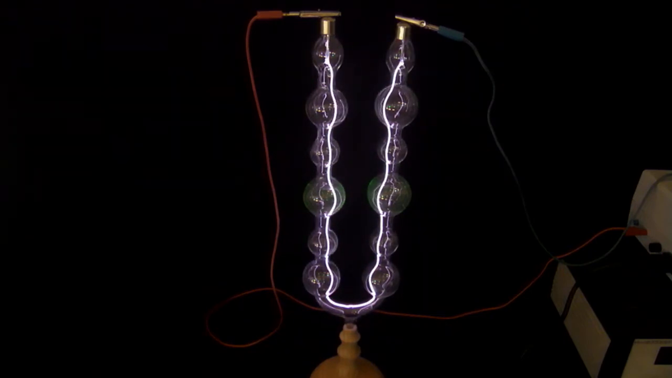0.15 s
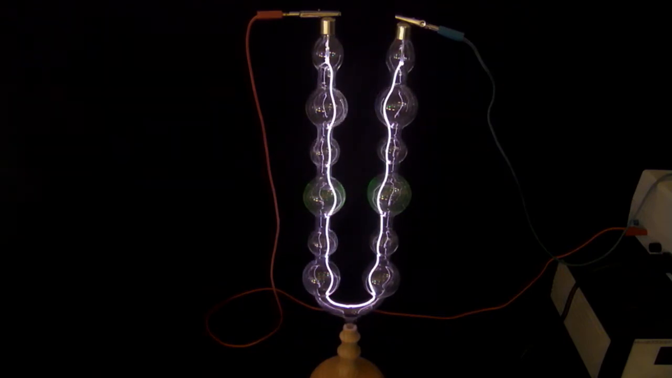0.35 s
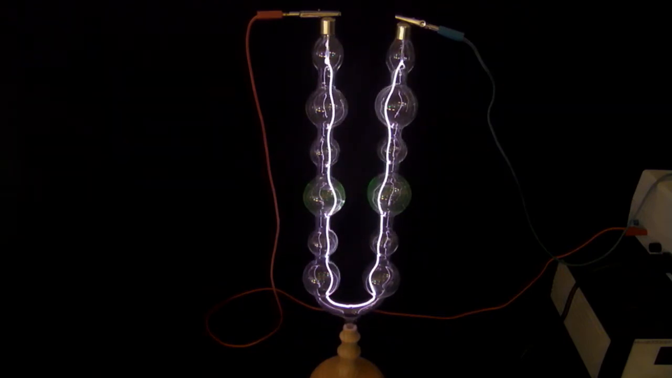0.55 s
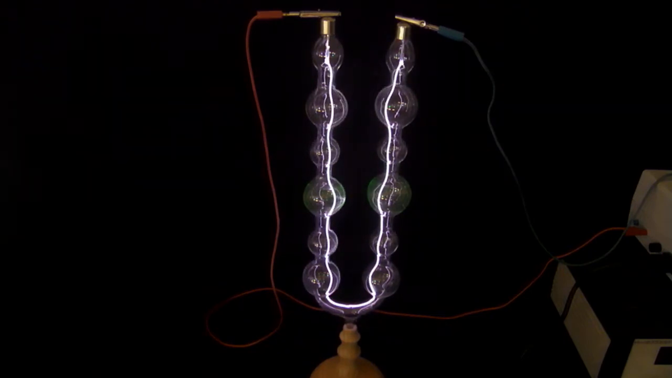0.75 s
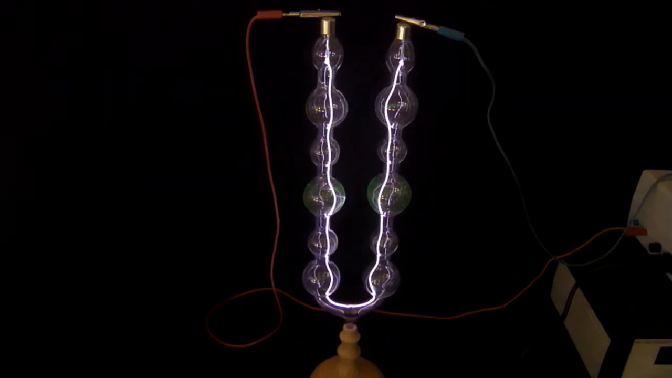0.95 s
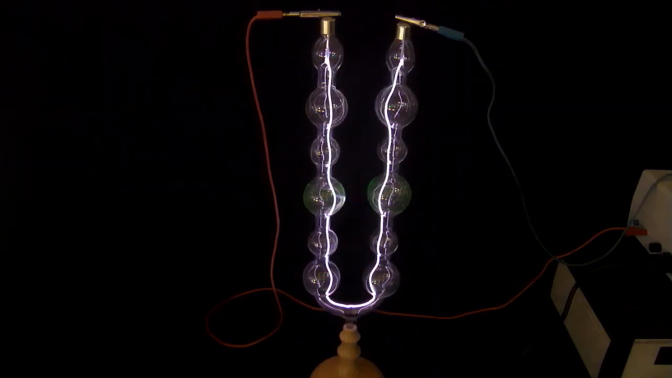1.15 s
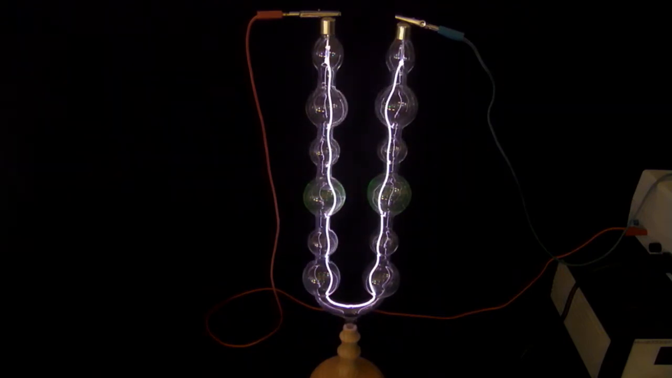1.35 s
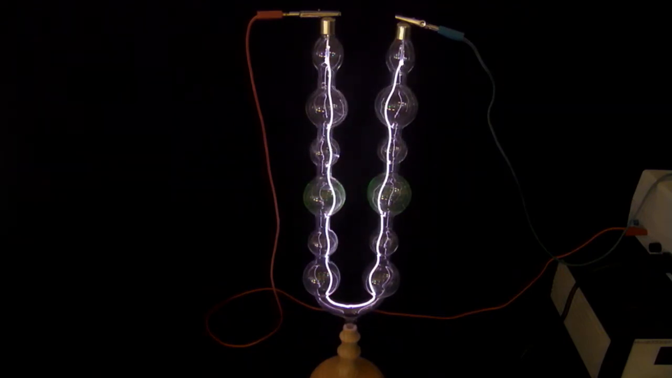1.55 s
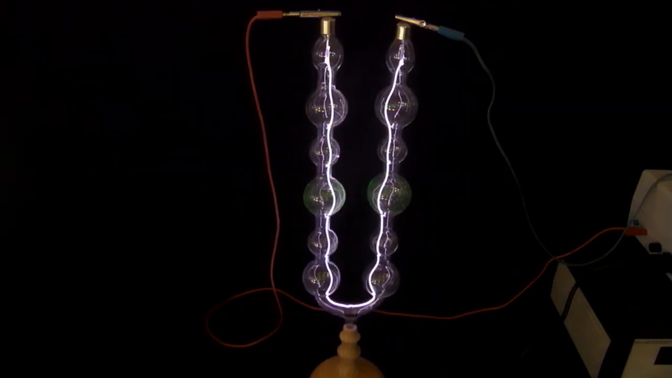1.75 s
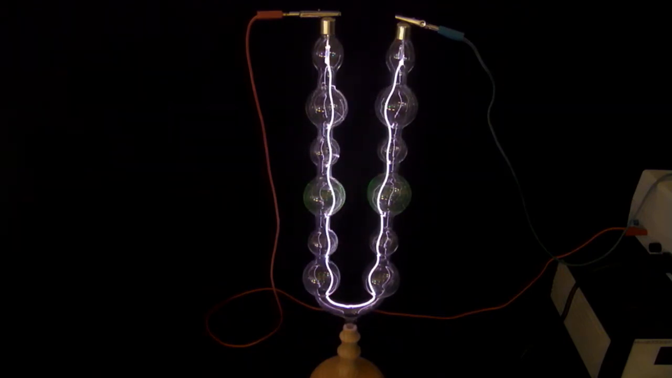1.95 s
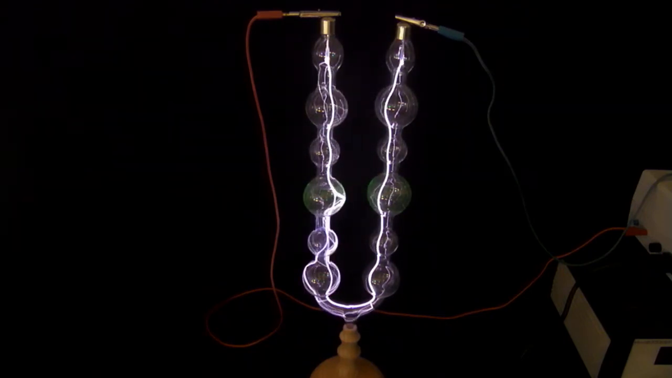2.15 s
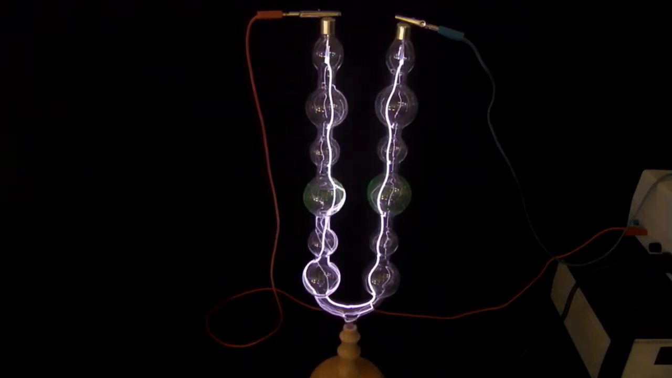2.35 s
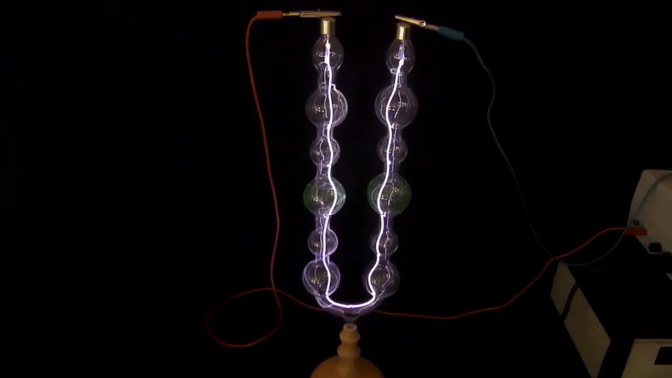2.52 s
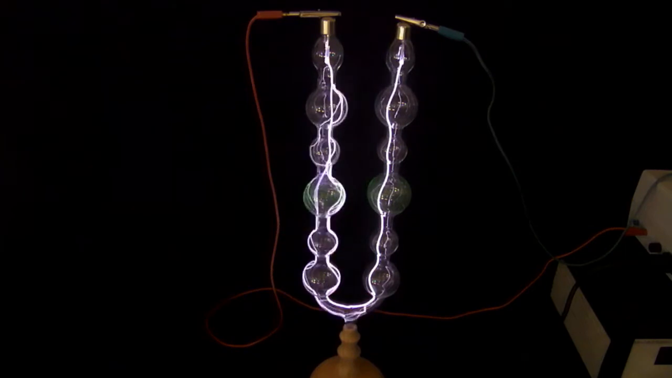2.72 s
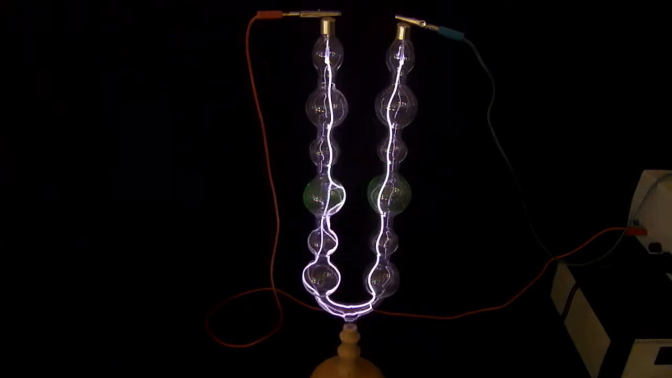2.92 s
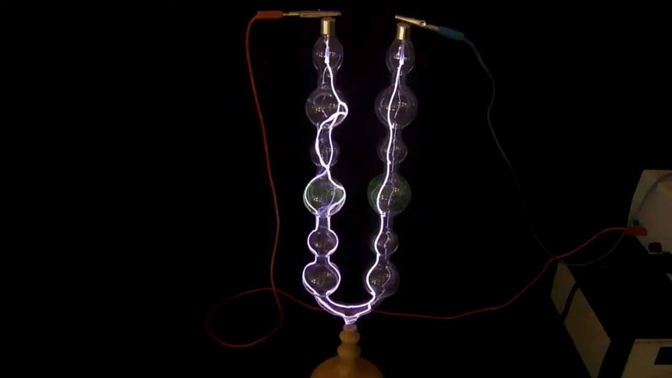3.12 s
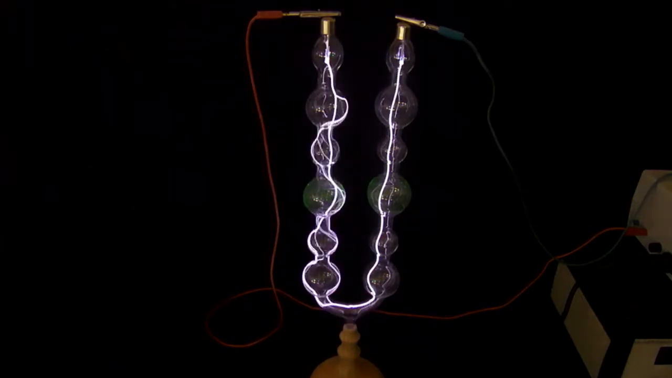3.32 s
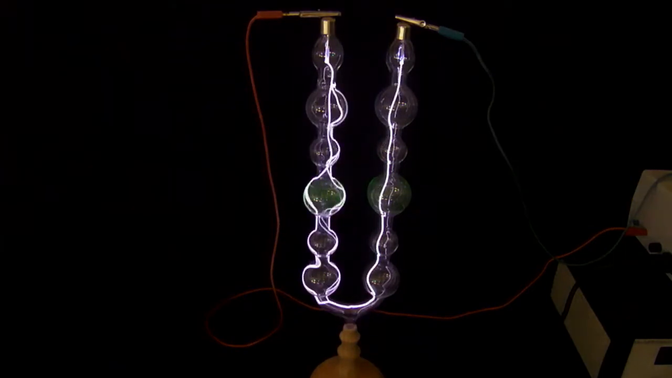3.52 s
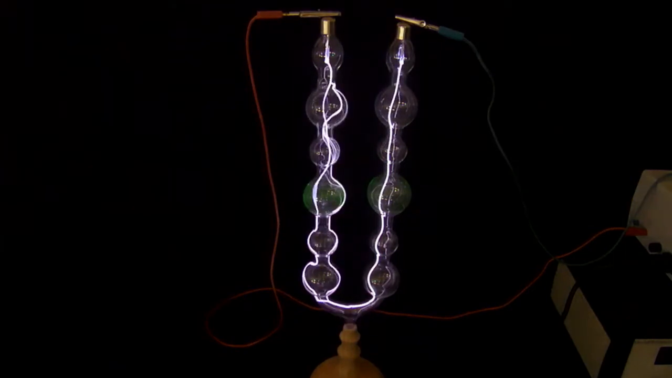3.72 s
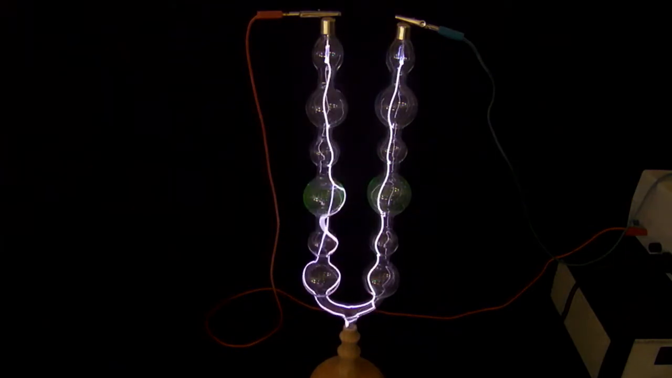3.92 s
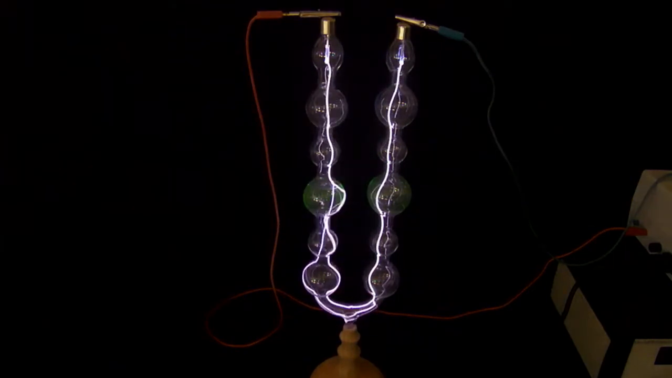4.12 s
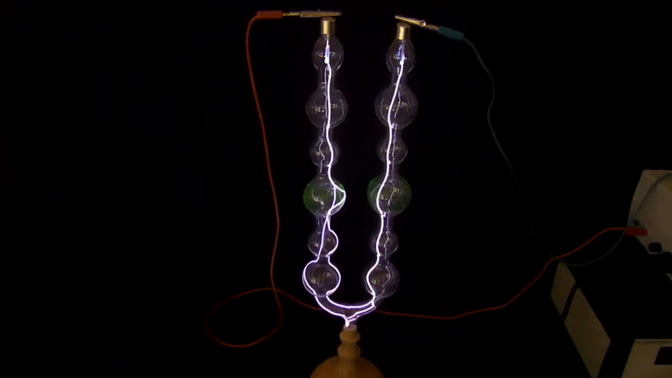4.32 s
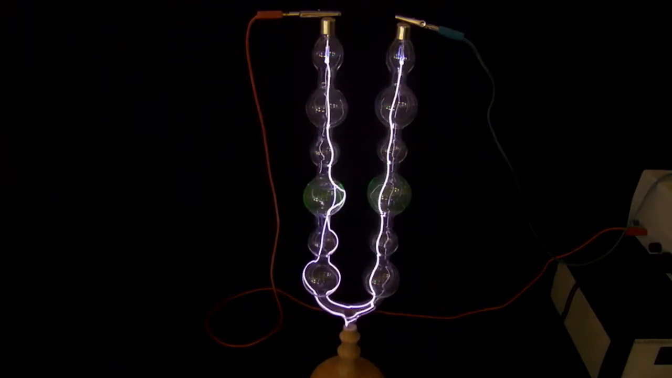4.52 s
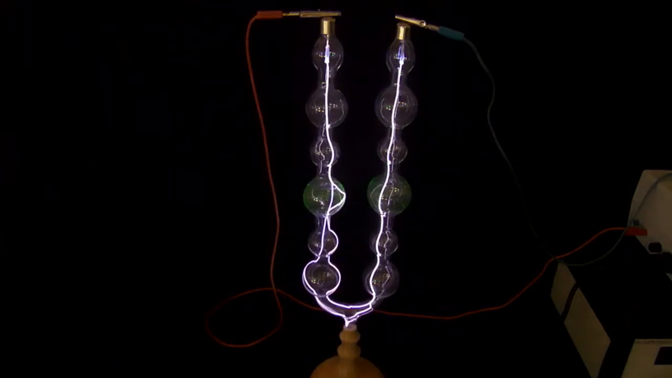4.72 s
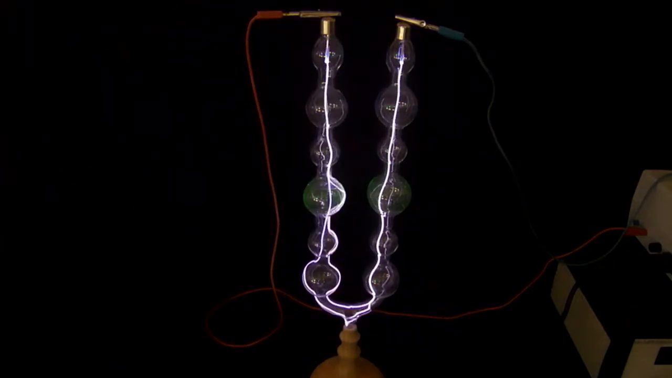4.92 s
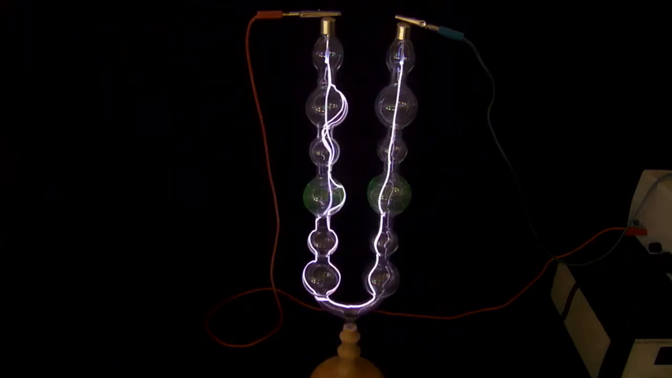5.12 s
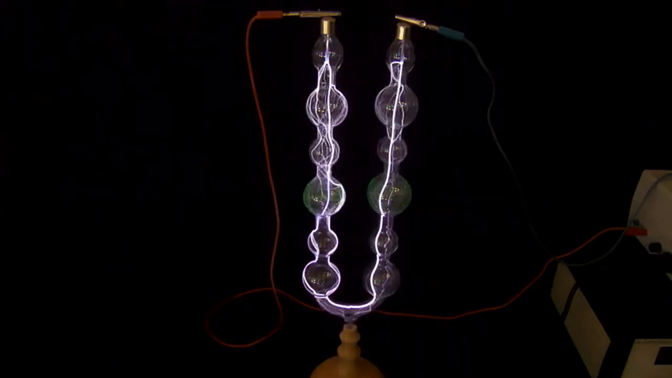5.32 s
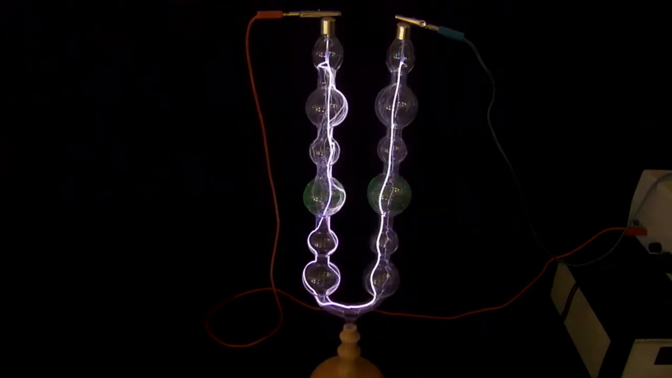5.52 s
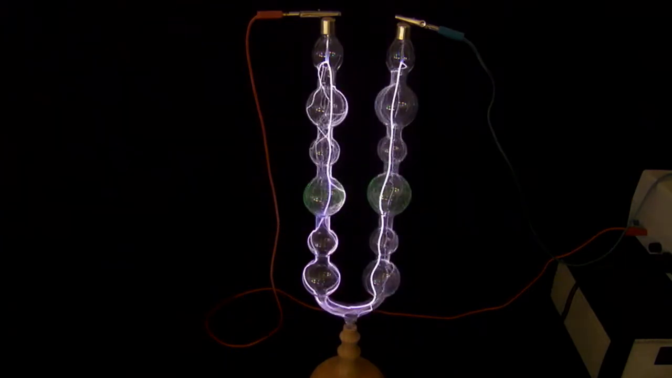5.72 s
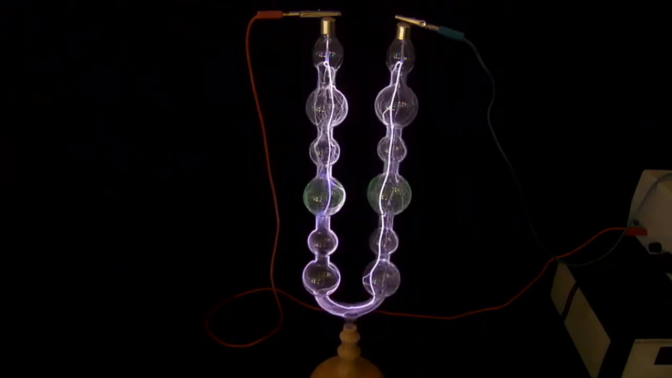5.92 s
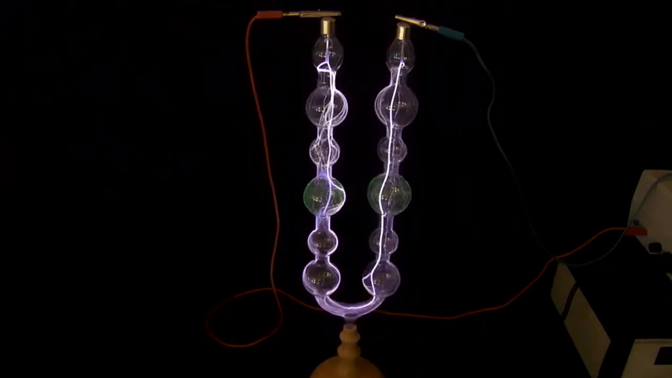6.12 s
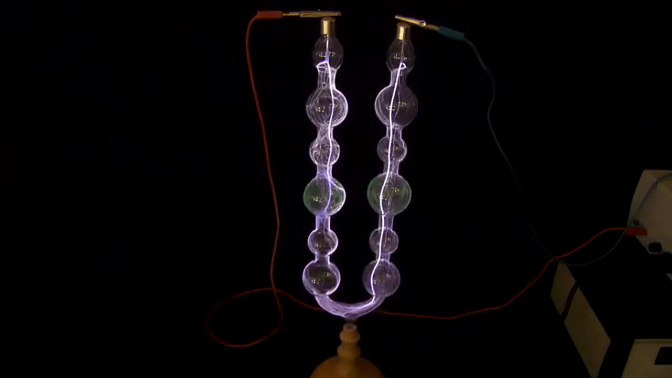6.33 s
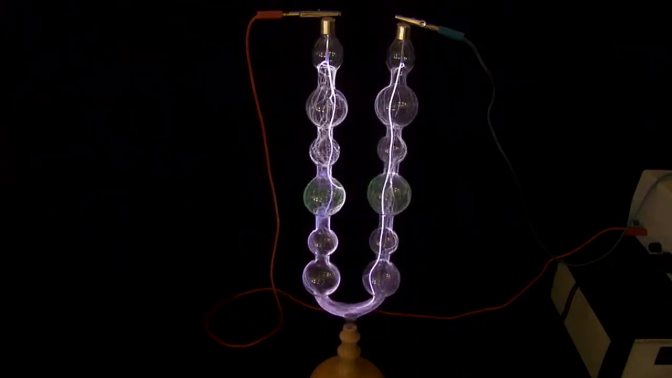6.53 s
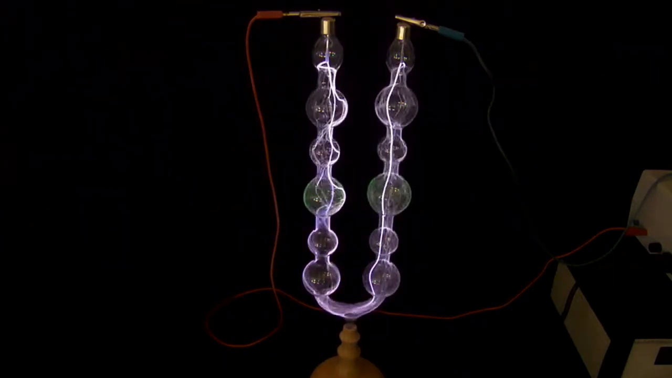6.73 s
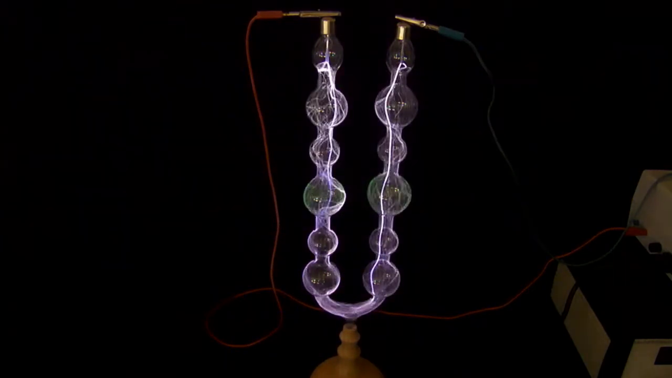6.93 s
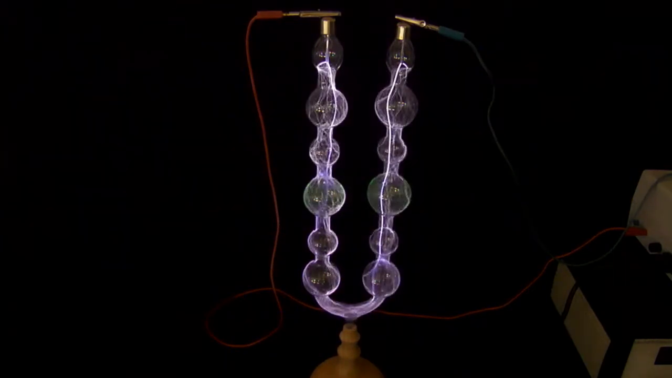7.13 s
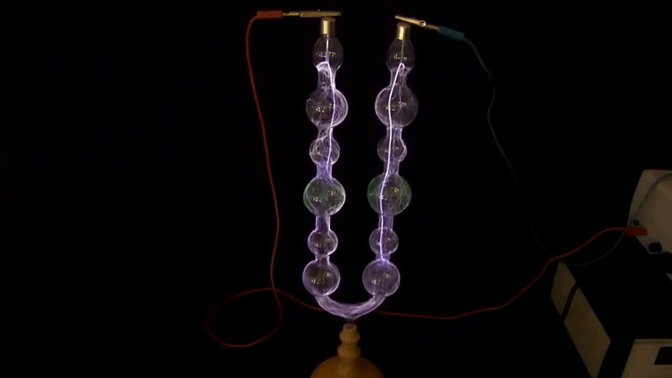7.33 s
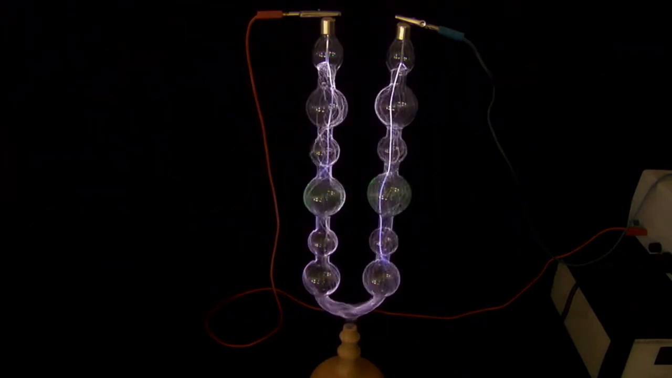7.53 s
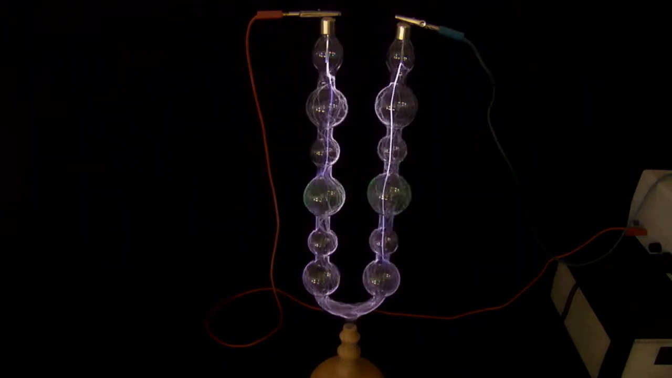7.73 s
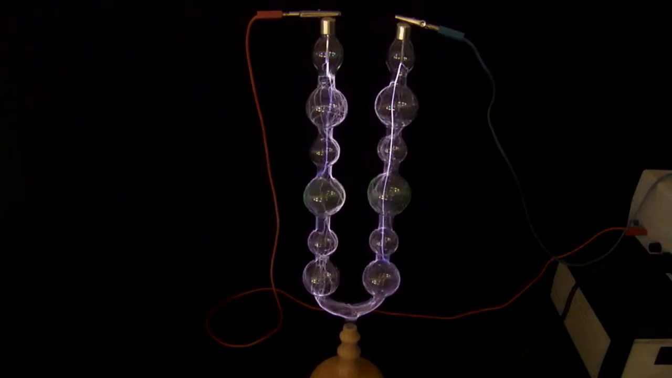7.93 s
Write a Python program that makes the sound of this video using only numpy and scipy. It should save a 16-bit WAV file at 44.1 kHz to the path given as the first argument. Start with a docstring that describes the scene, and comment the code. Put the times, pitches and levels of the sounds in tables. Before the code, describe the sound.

Continuous, ringing electrical sputter with a sharp metallic treble comes first, briefly surging around two seconds. A piercing, overtone-rich tone then sets in and is turned down by hand in three sweeps with two short holds. Fizzing drops away and flickers back midway, then thickens again over the falling buzz. Single microphone in a quiet indoor room, little reverberation, no other activity.

```python
"""A gas discharge tube on a high-voltage supply hisses in a quiet room: uneven breakdowns in the gas kick the
transformer core, which rings in fixed modes. At 2.7 s the supply's pulse rate locks into a whine, a stack of
overtones turned down by hand in three sweeps with two rests. Mostly between 3 and 5.5 s the sputter drops out
and returns in bursts. Room echo, room tone, microphone hiss and faint tones lie beneath, and a gain control
holds back loud moments of the one microphone."""
import sys
import numpy as np
from scipy import signal
from scipy.fft import rfft, irfft, next_fast_len
from scipy.io import wavfile
from scipy.ndimage import uniform_filter1d, map_coordinates

SR = 44100
rng = np.random.default_rng(int(sys.argv[2]) if len(sys.argv) > 2 else 0)


def persist_wave(psi):
    """Save psi, clipped to +-1, as 16-bit WAV."""
    counts = np.round(np.clip(psi, -1, 1) * 32767).astype(np.int16)
    wavfile.write(sys.argv[1], SR, np.atleast_2d(counts).T)


def boost_factor(decibels):
    """Convert a level in decibels to a linear amplitude factor."""
    exponent = np.asarray(decibels, float) / 20
    return 10 ** exponent


N = 355446

# strength of the uneven breakdowns and signed share of each kick that swings back: t/s, level/dB, share
SPUTTER = [(0, -1.5, -0.13), (.7, .5, -0.0027), (2.15, -0.5, -0.042), (2.23, 3, -0.23), (2.5, 0.5, -0.18),
           (2.62, -1.5, -0.0083), (2.8, -0.5, 0.23), (3.5, .5, 0.48), (4.35, -2, 0.35), (4.9, -5.5, -0.33),
           (5.2, -8, -0.019), (5.5, -3, -0.1), (6, 0, -0.23), (6.6, 1.5, -0.3), (7.3, 1, -0.42),
           (7.7, -2.5, -0.52), (8.06, -3, -0.42)]
# the arc burns evenly and the sputter drops out: t/s, length/s, level change/dB
LULLS = [(2.195, .025, -5), (3.09, .015, -7), (3.112, .058, -8), (3.205, .045, -11), (3.385, .012, -7),
         (3.42, .012, -7), (3.565, .13, -15), (3.695, .048, -25), (3.752, .01, -10), (3.775, .012, -8),
         (3.8, .04, -13), (3.865, .012, -8), (3.89, .012, -8), (3.92, .022, -14), (3.952, .019, -12),
         (3.99, .062, -15), (4.07, .071, -18), (4.153, .011, -14), (4.172, .009, -14), (4.192, .014, -15),
         (4.214, .017, -15), (4.24, .102, -18), (4.35, .703, -14), (5.083, .012, -7), (5.2, .03, -5),
         (5.275, .057, -8), (5.51, .015, -7)]
# pulse rate of the supply, turned down by hand in three sweeps with two rests: t/s, f/Hz
PULSE_RATE = [(2.735, 2760), (3.1, 2640), (3.3, 2578), (3.625, 2496), (3.95, 2408), (4.15, 2337),
              (4.35, 2297), (4.53, 2228), (4.625, 2217), (4.895, 2214), (4.925, 2169), (5.025, 1973),
              (5.075, 1885), (5.15, 1792), (5.2, 1755), (5.4, 1669), (5.725, 1579), (6.1, 1452),
              (6.35, 1345), (6.555, 1237), (6.88, 1234), (6.96, 1135), (7.0, 1102), (7.075, 1070),
              (7.35, 841), (7.475, 728), (7.535, 660), (7.66, 558), (7.725, 520), (7.79, 464), (7.875, 435),
              (7.93, 407), (8.06, 394)]
# the locked pulses: t/s, level/dB, relative level of the fundamental/dB, switch-off ahead of half period/us
LOCKED_PULSES = [(2.73, -3.5, 11, 15), (3.05, -0.5, -2, 12), (3.15, 5.5, 1, 8.9), (3.2, 4, -6, 73),
                 (3.42, 1.5, -2, 59), (3.52, -5, -4, 20), (3.58, 1, 12, 7.4), (3.74, -5, 13, 8),
                 (3.8, 1, 3, 24), (3.96, 1.5, -1, 16), (4.05, -6, -12, 50), (4.33, -1.5, -6, 35),
                 (4.45, 0.5, -9, 7.1), (4.88, 3, -14.5, 4), (4.95, -1, 2, 7.3), (5.0, 8.5, -8, 6),
                 (5.08, 0, -9, 16), (5.18, 3.5, -5, 6.9), (5.5, 2.5, 0, 17), (5.65, 0, 5, 25),
                 (5.95, 2, 2, 50), (6.25, 3, 0, 77), (6.5, 1.5, 4, 62), (6.85, 7.5, 2, 57),
                 (7.1, 3, -6, 84), (8.06, -1, -6, 78)]
# relative colour of the pulses before the core: f/Hz, level/dB
PULSE_COLOUR = [(400, 8), (2000, -4.5), (2600, -5), (3200, 2), (3750, -12.5), (4400, -3), (6200, 0.5),
                (9000, -5.5), (12000, -6), (13300, -0.5), (16000, -8)]
# core and winding modes: f/Hz, width/Hz, relative level/dB
CORE_MODES = [(2339, 40, -15), (2470, 45, -3), (2515, 35, -6), (2565, 35, -5), (2636, 30, -9),
              (3001, 108, -23), (3303, 38, -15), (3547, 63, -11), (3721, 72, -16), (4460, 203, -27),
              (5478, 123, -23), (5815, 76, -23), (6442, 43, -18), (6632, 123, -18), (7110, 119, -10),
              (7588, 72, -24), (8032, 46, -7), (8667, 51, -25), (9665, 38, -1), (10030, 64, -16),
              (10490, 50, -9), (10606, 31, -9), (10778, 55, -7), (11270, 135, -15), (11700, 35, -3),
              (12008, 31, 1), (12981, 91, -22), (13380, 80, -18), (13935, 53, -16), (14030, 40, -11)]
# way to the microphone, with a cancelling dip: f/Hz, level/dB
MIC_PATH = [(400, -9), (1500, -14), (2200, -4.5), (2400, -2), (2660, -2.5), (2800, -7), (3300, -1),
            (4200, -2), (5200, 1.5), (7700, 3.5), (7900, -19.5), (8300, 0.5), (9200, 5.5), (12500, 2),
            (15500, 10)]
# decay of the room: f/Hz, t60/s
ROOM_DECAY = [(1000, 0.11), (4000, 0.93), (15000, 0.024)]
# relative spectra of room tone and of microphone hiss: f/Hz, level/dB per Hz
ROOM_TONE = [(20, -14), (60, -15.5), (125, -13.5), (200, -9), (300, -3.5), (490, -1), (800, -3),
             (1500, -5.5), (2200, -8.5), (3500, -37), (6000, -67)]
MIC_HISS = [(1500, -120), (2000, -4), (5000, -2.5), (10000, -14), (16000, -7)]
# faint tones: start t/s, end t/s, f/Hz, mean level/dB rms
FAINT_TONES = [(0, 3.3, 414.5, -70), (0, 2.7, 979.8, -67), (2.68, 3.2, 1060, -66), (2.3, 4.4, 190, -75)]

LOCK_S = PULSE_RATE[0][0]  # the whine sets in
RIPPLE_HZ, RIPPLE_DB = 100, 0.9  # rectified mains riding on the supply
# middle range of the kicks; extra dB per dB of strength; extra dB once locked
MIDDLE_DB, MIDDLE_GROWS, MIDDLE_LOCKED_DB = 2.5, 0.1, -2.5
# breakdowns bunch at a low core mode when the pulse rate comes within reach of it
PUMP_DB, PUMP_HZ, PUMP_WIDTH_HZ, PUMP_REACH_HZ = 17.5, 2526, 38, 170
SCATTER, SCATTER_POWER = 0.003, 1.504  # timing scatter as share of the rate at 2 kHz; grows with the rate
SETTLE, SETTLE_S = 0.014, 0.42  # extra scatter as the lock sets in, and its fading time
OFF_KICK = 0.64  # kick at switch-off against switch-on
SWING_S, SWING_HZ = 0.000415, 4800  # delay of the swing back; it carries mainly above this


def unit(x):
    """Scales a signal to an rms of one."""
    return x / np.sqrt(np.mean(x ** 2) + 1e-20)


def along(points, hz):
    """Reads (f/Hz, value) points on a log frequency axis."""
    f, v = np.transpose(points)
    return np.interp(np.log(hz + 1), np.log(f + 1), v)


def curves(rows):
    """One value per sample for each column after the time."""
    s, *columns = np.transpose(rows)
    t = np.arange(N) / SR
    return [np.interp(t, s, column) for column in columns]


def wobble(rate, count=1):
    """Smooth random curves with rate knots a second."""
    knots = rng.standard_normal((count, int(N * rate / SR) + 4))
    at = np.arange(0, N + 32, 32) * rate / SR  # one value held for 32 samples
    return np.squeeze([np.repeat(map_coordinates(row, [at]), 32)[:N] for row in knots])


def filtered(x, response):
    """Shapes x by a complex response of frequency."""
    m = 2 * next_fast_len(N // 2 + SR // 4)
    return irfft(rfft(x, m) * response(np.fft.rfftfreq(m, 1 / SR)), m)[:N]


def unrest():
    """Gain of the uneven breakdowns: slow strength, drop-outs, flutter and supply ripple."""
    db = curves(SPUTTER)[0]
    for s, length, depth_db in LULLS:
        db[round(s * SR):round((s + length) * SR)] += depth_db
    flutter_db = 0.433 * wobble(12) + 0.82 * wobble(40) + 0.901 * wobble(150)
    ripple_db = RIPPLE_DB * np.sin(2 * np.pi * RIPPLE_HZ * np.arange(N) / SR)
    return boost_factor(uniform_filter1d(db + flutter_db, size=60) + ripple_db)


def sputter(gain):
    """Breakdowns kick at random moments, a few thousand a second, with scattered size and sign."""
    draw = rng.random((N, 2))
    struck = draw[:, 0] < 6000 / SR
    kicks = gain * unit(struck * (draw[:, 1] - 0.5))

    middle = filtered(kicks, lambda hz: np.exp(-np.log(hz / 3900 + 1e-6) ** 2 / 0.55))
    locked = np.arange(N) / SR > LOCK_S
    middle_gain = boost_factor(MIDDLE_DB + MIDDLE_GROWS * curves(SPUTTER)[0] + MIDDLE_LOCKED_DB * locked)

    near = locked * np.exp(-((curves(PULSE_RATE)[0] - PUMP_HZ) / PUMP_REACH_HZ) ** 2)
    bunched = filtered(near * kicks, lambda hz: np.exp(-((hz - PUMP_HZ) / PUMP_WIDTH_HZ) ** 2))
    return kicks + (middle_gain - 1) * middle + boost_factor(PUMP_DB) * bunched


def whine(gain):
    """Each pulse kicks at switch-on and switch-off, built as overtones; breakdowns shake timing and size."""
    start, t = round(LOCK_S * SR), np.arange(N) / SR
    hz = curves(PULSE_RATE)[0]
    db, fundamental_db, early_us = curves(LOCKED_PULSES)

    scatter = SCATTER * (hz / 2000) ** SCATTER_POWER
    scatter = scatter + SETTLE * np.exp(-np.abs(t - LOCK_S) / SETTLE_S)
    shaken_hz = hz * (1 + 0.000294 * wobble(30) + scatter * gain * wobble(150))
    turn = np.exp(2j * np.pi * np.cumsum(shaken_hz) / SR)
    duty = 0.5 - hz * early_us / 1e6
    late = np.exp(-2j * np.pi * duty)  # switch-off trails switch-on by the duty

    waver = boost_factor(1.6 * wobble(14, count=8))  # overtones share eight level curves
    stack = boost_factor(fundamental_db) * turn.real * (t > LOCK_S)
    on, off = turn.copy(), OFF_KICK * late
    for k in range(2, 41):
        # from the moment the overtone falls into hearing
        part = slice(max(start, np.argmax(k * hz < 16500)), N)
        on *= turn
        off *= late
        both_kicks = (on[part] * (1 + off[part])).real / (1 + OFF_KICK)
        stack[part] += waver[k % 8, part] * both_kicks

    share = np.sqrt(hz / 8000)  # the same energy is split among more overtones at low rates
    robbed_db = -5.5 * gain * np.abs(wobble(45))  # a breakdown robs the regular pulse
    level = share * boost_factor(db + 5.5 + uniform_filter1d(robbed_db, size=60))
    return filtered(level * stack, lambda f: boost_factor(along(PULSE_COLOUR, f)))


def restrike(kicks):
    """The treble of every kick swings back a moment later, with or against its sign."""
    share = curves(SPUTTER)[1]
    again = filtered(kicks, lambda hz: np.exp(-2j * np.pi * hz * SWING_S) / (1 + (SWING_HZ / (hz + 1)) ** 6))
    return kicks + share * again


def core(f):
    """Core modes add in power, coloured by the way to the microphone; causal phase rings after each kick."""
    power = sum(boost_factor(db) ** 2 * (f * width) ** 2 / ((centre * centre - f * f) ** 2 + (f * width) ** 2)
                for centre, width, db in CORE_MODES)
    # folding the cepstrum forward in time gives the minimum phase of this gain
    cepstrum = irfft(np.log(np.sqrt(power) * boost_factor(along(MIC_PATH, f)) + 1e-6))
    half = len(cepstrum) // 2
    cepstrum[1:half] *= 2
    cepstrum[half + 1:] = 0
    return np.exp(rfft(cepstrum))


def room(x):
    """A noise tail after a short gap, in which each frequency dies at its own speed."""
    hz, t, z = signal.stft(rng.standard_normal(SR // 2), SR, nperseg=256)
    decay = boost_factor(-60 * t / along(ROOM_DECAY, hz)[:, None])
    tail = signal.istft(z * decay, SR, nperseg=256)[1]
    delayed = np.pad(x, (200, 0))
    return signal.fftconvolve(delayed, tail / np.linalg.norm(tail))[:N]


def air():
    """Room tone and microphone hiss are shaped noise; faint sines waver in level and phase."""
    t = np.arange(N) / SR
    tone = boost_factor(-56) * unit(filtered(rng.standard_normal(N), lambda hz: boost_factor(along(ROOM_TONE, hz))))
    hiss = boost_factor(-56.5) * unit(filtered(rng.standard_normal(N), lambda hz: boost_factor(along(MIC_HISS, hz))))
    hum = np.zeros(N)
    for begin, end, hz, db in FAINT_TONES:
        fade = uniform_filter1d(1.0 * ((t >= begin) & (t < end)), size=4000)
        level = np.sqrt(2) * boost_factor(db + wobble(5.1))
        hum += fade * level * np.sin(2 * np.pi * hz * t + 0.65 * wobble(9.6))
    return tone + hiss + hum


def scene():
    """Sputter and whine ring through the core into the room, the same on both channels."""
    gain = unrest()
    kicks = restrike(sputter(gain) + whine(gain))
    supply = boost_factor(-11) * filtered(kicks, core)
    echo = boost_factor(-13) * room(supply)
    return np.tile(supply + echo + air(), (2, 1))


def top_cut(x):
    """Nothing passes above the cut-off."""
    return signal.sosfilt(signal.butter(12, 16130, fs=SR, output="sos"), x)


def record(dry):
    """Gain control takes off half of each dB above -14 dB, eased over 55 ms; the extreme treble is cut."""
    level_db = 10 * np.log10(np.abs(uniform_filter1d(dry[0] ** 2, size=1300)) + 1e-12)
    cut_db = -0.5 * np.maximum(level_db + 14, 0)
    keep = np.exp(-1 / (0.055 * SR))
    cut_db = signal.lfilter([1 - keep], [1, -keep], cut_db)
    kept = filtered(dry[0] * boost_factor(cut_db), lambda hz: hz < 15730)
    mix = np.tile(kept, (2, 1))
    return top_cut(mix)


dry = scene()
out = record(dry)
persist_wave(out)
```